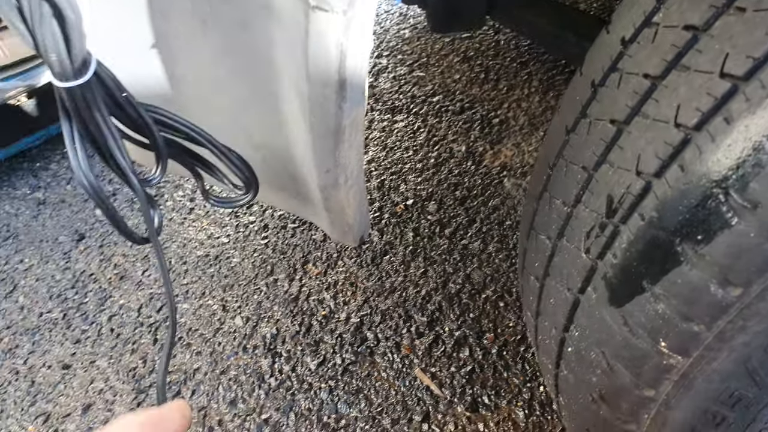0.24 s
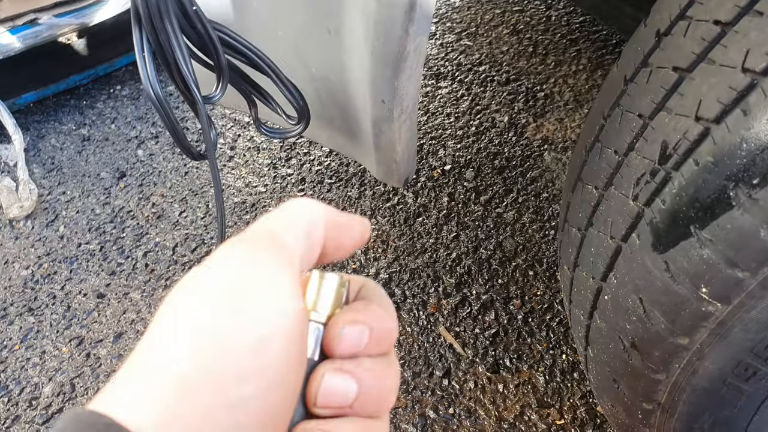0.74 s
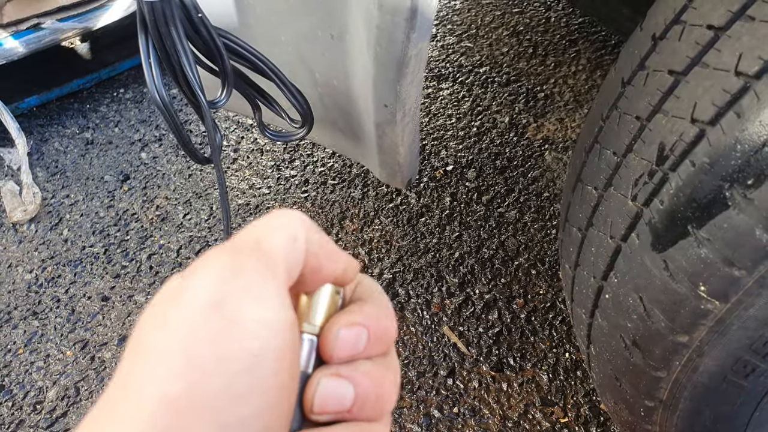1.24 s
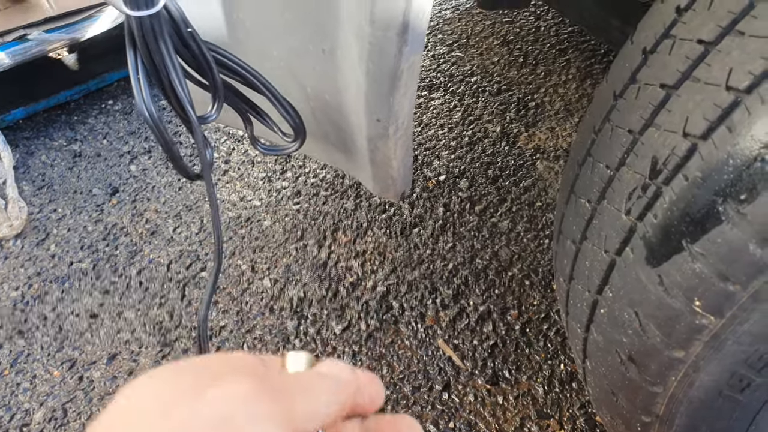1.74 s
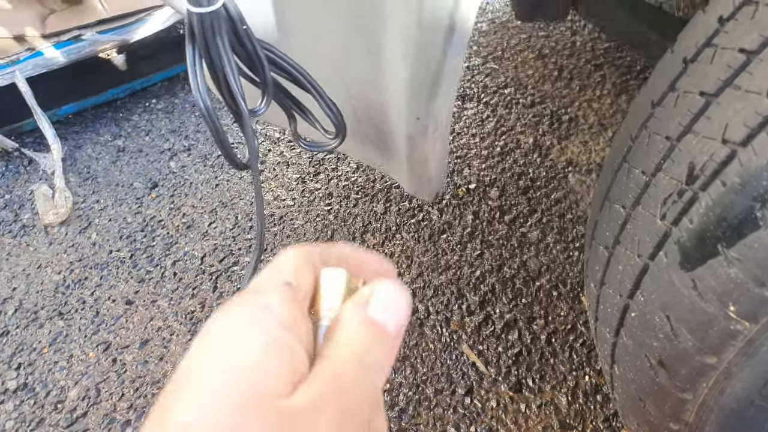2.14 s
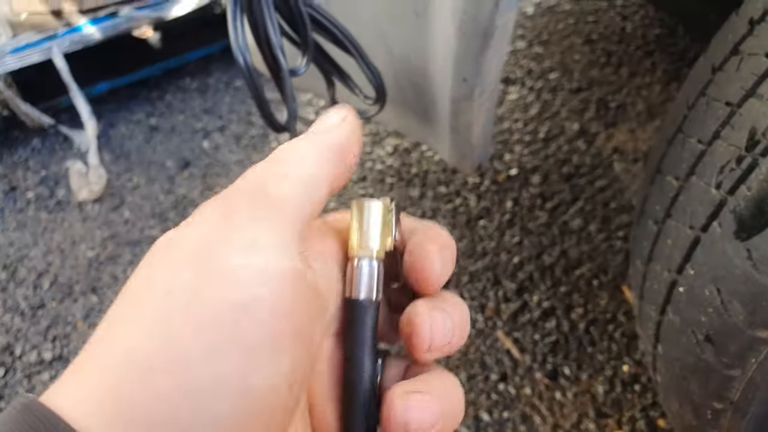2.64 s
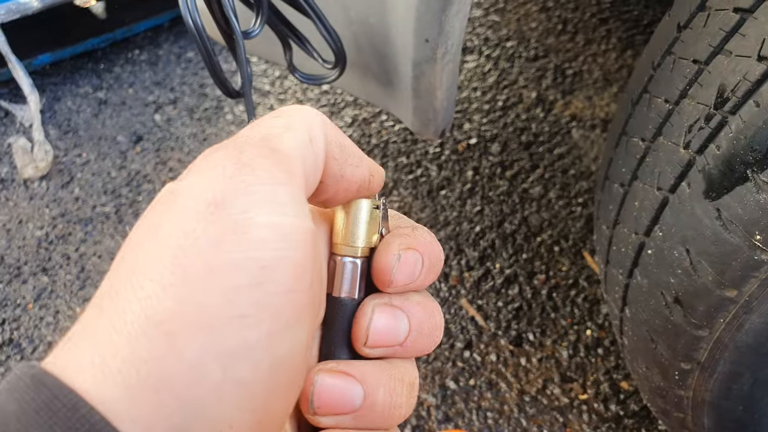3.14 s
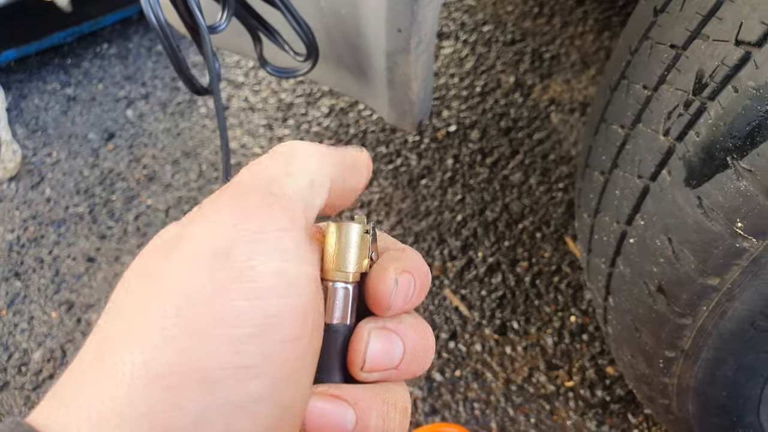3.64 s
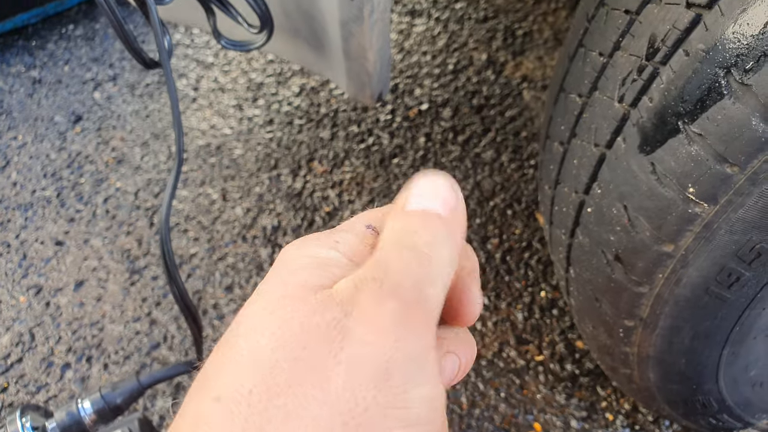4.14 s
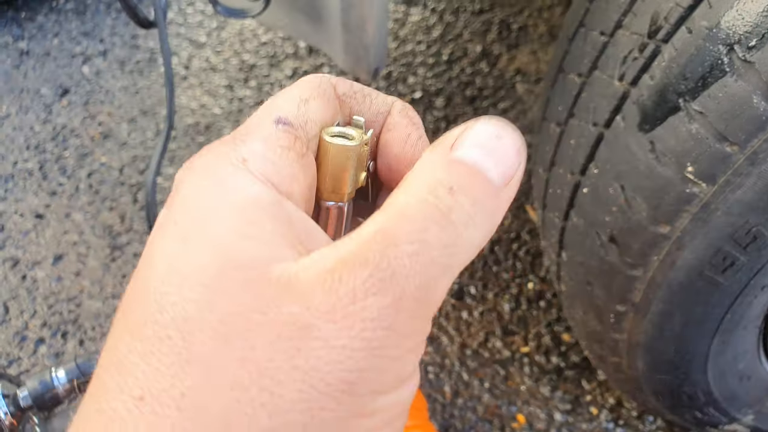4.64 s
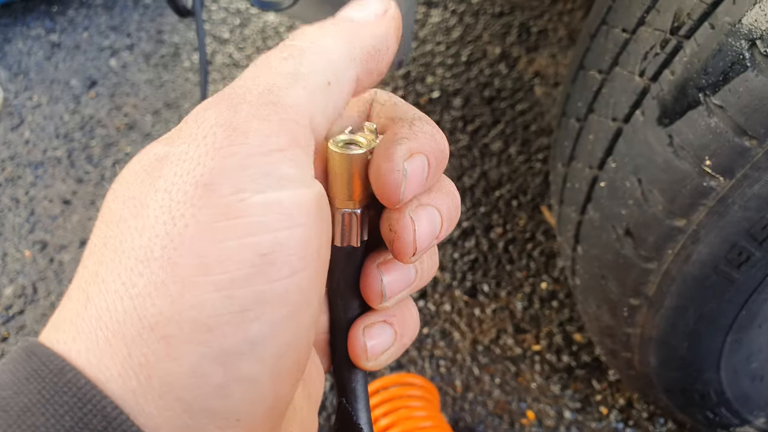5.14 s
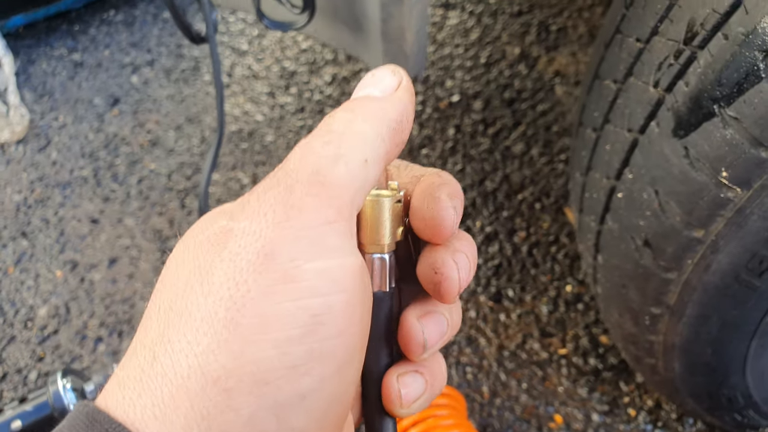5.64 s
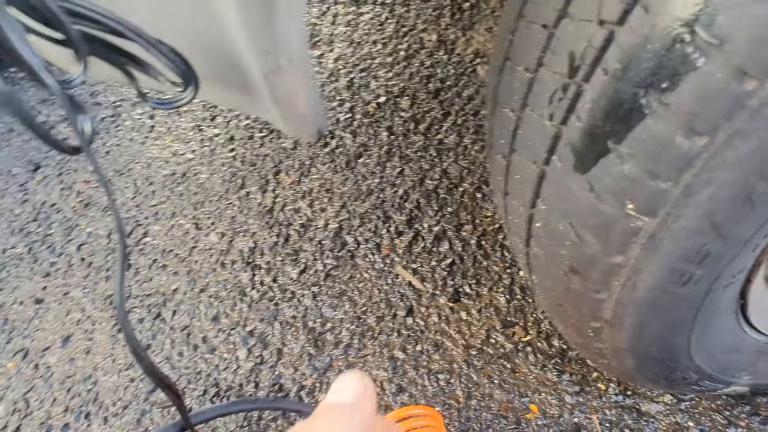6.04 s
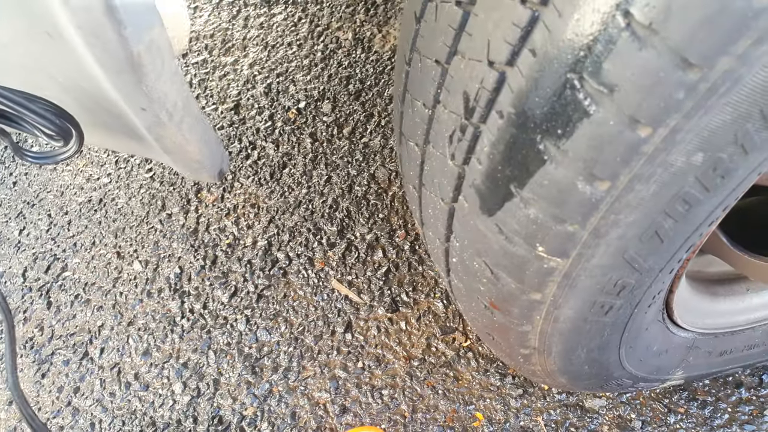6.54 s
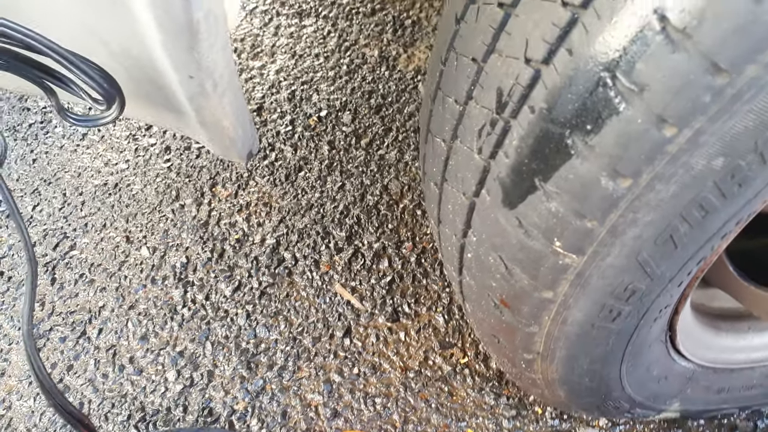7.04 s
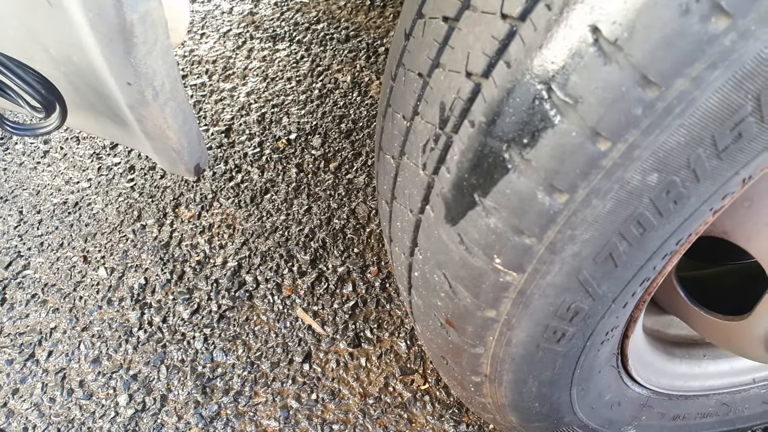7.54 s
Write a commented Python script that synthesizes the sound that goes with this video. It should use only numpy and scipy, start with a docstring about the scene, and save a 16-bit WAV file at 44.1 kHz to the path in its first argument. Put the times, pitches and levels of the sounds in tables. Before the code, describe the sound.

Loud, close hiss of air from an open hose, changing colour under a hand, over the even rattling hum of a portable compressor.

```python
"""Air compressor and open hose

A small twin-piston compressor drones beside a parked car: two uneven strokes a turn ring its casing,
and the valves clack. A hand plays with the open hose end, so the air jet hisses close to a phone's two
ports, its colour shifting on each side as thumb and nozzle move. Late on, the phone swings towards
the wheel and the pump changes colour."""
import sys
import numpy as np
from scipy import signal
from scipy.fft import rfft, irfft
from scipy.io import wavfile
from scipy.ndimage import uniform_filter1d

SR = 44100
rng = np.random.default_rng(int(sys.argv[2]) if len(sys.argv) > 2 else 0)


def transcribe(u):
    """Save the signal u as a 16-bit wav file named by the first command-line argument.

    u: samples, shape (n,) or (channels, n), limited to [-1, 1]; the rate is SR.
    q: integer samples, one column per channel.
    """
    v = np.clip(np.atleast_2d(u).T, -1, 1)
    q = np.round(v * 32767).astype(np.int16)
    wavfile.write(sys.argv[1], SR, q)


N = 343344

SECOND_STROKE_AT, SECOND_STROKE_SIZE = .435, .85  # place in the turn, size against the first stroke
KNOCK_AT = .88  # place in the turn where the valves close
# How far the pump leads at the left port. Each row: frequency in Hz, lead in radians.
PUMP_LEAD = [(0, 0), (300, .25), (780, .7), (840, 2.2), (920, 1.2), (1040, 2.9), (1240, 1.6), (1480, 3),
             (1800, 1.9)]
# The casing's change of colour after the swing. Each row: frequency in Hz, left and right gain in dB.
SWUNG_CASING = [(415, 0.5, 1.5), (440, -13, 2), (540, 0.5, -17), (582, 2, 7), (700, -12, -0.5),
                (950, 7, -0.5)]


def undb(db):
    return 10 ** (np.asarray(db) / 20)


def read(table, at, log=False):
    """Columns of a table, joined by straight lines along the first."""
    key, *columns = np.transpose(table)
    if log:
        key, at = np.log(key), np.log(np.maximum(at, 1))
    return np.array([np.interp(at, key, column) for column in columns])


def wander(shape, sizes):
    """Random drift with a spread of 1, smoothed twice along each axis."""
    field = rng.standard_normal(shape)
    for axis, size in enumerate(sizes):
        for _ in range(2):
            field = uniform_filter1d(field, max(int(size), 1), axis=axis)
    return field / field.std()


def shaped_noise(gain_db, common, lead, size):
    """Stereo noise in dB per Hz; a share is common to both ports, and the left leads in radians."""
    frames = dict(nperseg=size, noverlap=size * 3 // 4)
    hz, s, noise = signal.stft(rng.standard_normal((3, N)), SR, **frames)
    share = np.clip(common(hz[:, None], s), 0, 1)
    ports = np.sqrt(share) * noise[0] + np.sqrt(1 - share) * noise[1:]
    ports[0] *= np.exp(1j * lead(hz[:, None], s))
    return signal.istft(ports * undb(gain_db(hz, s)), SR, **frames)[1][:, :N] * np.sqrt(SR / 2)


def causal_phase(log_gain):
    """Phase of a body that rings only after it is pushed, from the cepstrum of its gain."""
    cepstrum = irfft(log_gain)
    half = len(cepstrum) // 2
    cepstrum[1:half] *= 2
    cepstrum[half + 1:] = 0
    return rfft(cepstrum).imag


def swung(t, start_s=5.7, length_s=.52):
    """0 before the phone swings towards the wheel, 1 after."""
    return np.clip((t - start_s) / length_s, 0, 1)


def valve_share(hz, from_hz=1120, full_hz=1200):
    """Crossover: 0 where the casing rules, 1 where the valve plates do."""
    return np.clip((hz - from_hz) / (full_hz - from_hz), 0, 1)


def pump_db(t, clack_db=(-1.5, 4.5), swung_clack_db=(3.5, -4)):
    """Heard level of the casing and of the valve clack (left, right), which rises and falls further."""
    # The phone's automatic gain on the pump, drawn as a set curve. Each row: time in seconds, gain in dB.
    gain_ride = [(0, 4.5), (.5, 0.5), (1.0, 1), (1.4, 0), (2.25, 1.5), (2.7, 0), (3.4, -1.5), (4.0, -1.5),
                 (4.35, 0), (4.55, -3), (5.6, -.5), (6.3, -1.5), (7.2, 2), (7.79, 2.5)]
    casing_db = read(gain_ride, t)[0]
    port_db = np.array(clack_db)[:, None] + np.outer(swung_clack_db, swung(t))
    return casing_db, 1.79 * casing_db + port_db


def pump_harmonics(crank_hz=40.04, knock_smear=.004):
    """The pump's tones: their frequencies, and a player that mixes them along the crank's turns."""
    # The pump's spectrum. Each row: multiple of the crank speed, left and right base level in dB.
    harmonics = [(1, -43, -43), (2, -38, -38), (3, -39, -38), (4, -42, -42), (5, -40, -40), (6, -50, -49),
                 (7, -38, -37), (8, -49, -45), (9, -43, -38), (10, -60, -41), (11, -55, -55),
                 (12, -43, -54), (13, -38, -54), (14, -34, -41), (15, -46, -55), (16, -46, -49),
                 (17, -51, -56), (18, -47, -47), (19, -53, -51), (20, -59, -45), (21, -43, -46),
                 (22, -53, -56), (23, -47, -44), (24, -56, -50), (25, -56, -45), (27, -52, -48),
                 (28, -50, -49), (29, -45, -47), (30, -42, -48), (31, -44, -42), (32, -41, -44),
                 (33, -47, -44), (34, -42, -42), (35, -46, -44), (36, -51, -47)]
    order, *level_db = np.transpose(harmonics)
    hz = order * crank_hz
    stroke_pair = 1 + SECOND_STROKE_SIZE * np.exp(-2j * np.pi * order * SECOND_STROKE_AT)
    body = np.log(undb(level_db[1]) / (np.abs(stroke_pair) + .3))
    body = uniform_filter1d(body, size=3, mode="nearest")
    # An open port radiates no steady pressure, so each suction dip rebounds.
    body = np.interp(np.arange(65), order, body, left=body[0] - 3)
    dip_phase = np.angle(stroke_pair) + causal_phase(body)[order.astype(int)]
    knock_phase = -2 * np.pi * (order * KNOCK_AT + knock_smear * (order - 32) ** 2)
    phase = np.where(valve_share(hz) > .5, knock_phase, dip_phase)
    lead = read(PUMP_LEAD, hz)[0] * np.array([[1], [0]])
    partials = -np.sqrt(2) * undb(level_db) * np.exp(1j * (phase + lead))

    def play(gains, turn):
        cycle = np.arange(2049) / 2048
        wave = np.real(partials * gains @ np.exp(2j * np.pi * order[:, None] * cycle))
        return np.array([np.interp(turn % 1, cycle, side) for side in wave])
    return hz, play


def valve_knock(t, turn, jitter_turns=.002, scatter_db=2):
    """The valves knock once a turn, no two closings alike in time or force."""
    hz, play = pump_harmonics()
    _, valve_db = pump_db(t)
    knock = play(valve_share(hz) > .5, turn + jitter_turns * wander(N, [SR / 25]))
    swing_db = np.interp(swung(t), [0, 1], [-1, 1.5])
    return knock * undb(valve_db + swing_db + scatter_db * wander(N, [SR / 80]))


def casing_drone(t, turn, bass_hz=250):
    """Two suction dips a turn ring the casing; the gain ride moves the bass more than the mids."""
    hz, play = pump_harmonics()
    casing_db, _ = pump_db(t)
    bass = play(hz <= bass_hz, turn) * undb(1.3 * casing_db)
    mid_band = (hz > bass_hz) * (valve_share(hz) <= .5)
    before = play(mid_band, turn)
    after = play(mid_band * undb(read(SWUNG_CASING, hz)), turn)
    mids = before + swung(t) * (after - before)
    return bass + mids * undb(casing_db + wander(N, [SR / 12]))


def panel_rings(t, turn, strike_at=.99, scatter_db=2, scatter_rad=.75, swung_right_db=11.5):
    """Each turn's first stroke strikes the casing panels, never with quite the same force or timing."""
    # Panel modes. Each row: pitch in Hz, time to fall 60 dB in seconds, left and right base level
    # in dB, left lead in radians.
    modes = [(1045.7, 0.15, -23.5, -38, 2.75), (1554, 0.057, -35.5, -49.5, 0.2)]
    hits = np.flatnonzero(np.diff(np.floor(turn - strike_at)))
    panels = 0
    for hz, t60, *level_db, lead in modes:
        force, slip = rng.standard_normal((len(hits), 2)).T
        blows = np.zeros(N, complex)
        blows[hits] = undb(scatter_db * force) * np.exp(1j * scatter_rad * slip)
        pole = np.exp(2j * np.pi * hz / SR - np.log(1000) / (t60 * SR))
        ring = signal.lfilter([1], [1, -pole], blows)
        panels += undb(level_db)[:, None] * np.imag(ring * np.exp(1j * np.array([[lead], [0]])))
    casing_db, _ = pump_db(t)
    return panels * undb(casing_db + np.outer([0, swung_right_db], swung(t)))


def pump_rattle(turn, burst_turns=.13, clack_turns=.09):
    """Noise that bursts after each stroke in the casing and at each closing in the valves."""
    # Rough breath between the tones. Each row: frequency in Hz, left and right base level in dB per Hz.
    breath = [(25, -84, -84), (60, -64, -64), (180, -71, -71), (400, -78, -72), (460, -81, -79),
              (600, -77, -77), (800, -75, -74), (980, -74, -72), (1040, -62, -69), (1110, -68, -73),
              (1250, -69, -68), (1420, -72, -71), (1600, -78, -78)]

    def pulsed_noise(band, gate):
        def gain_db(hz, s):
            casing_db, valve_db = pump_db(s)
            casing_db = casing_db + read(SWUNG_CASING, hz)[:, :, None] * swung(s)
            share = valve_share(hz)[:, None]
            ride_db = (1 - share) * casing_db + share * valve_db[:, None]
            return read(breath, hz, log=True)[:, :, None] + ride_db + 10 * np.log10(band(share) + 1e-9)
        noise = shaped_noise(gain_db, common=lambda hz, s: .88 - hz / 2600,
                             lead=lambda hz, s: read(PUMP_LEAD, hz)[0], size=2048)
        return noise * gate / np.sqrt(np.mean(gate ** 2))
    first = np.exp(-(turn % 1) / burst_turns)
    second = SECOND_STROKE_SIZE * np.exp(-((turn - SECOND_STROKE_AT) % 1) / burst_turns)
    from_closing = (turn - KNOCK_AT + .5) % 1 - .5
    closing = np.exp(-.5 * (from_closing / clack_turns) ** 2)
    casing = pulsed_noise(band=lambda share: 1 - share, gate=.65 + first + second)
    valves = pulsed_noise(band=lambda share: share, gate=.5 + closing)
    return casing + valves


def hand_db(t, hold_share=.31):
    """The hand's EQ on the jet: slow aim plus thumb strokes that close, hold and open."""
    # The nozzle's aim. Each row: time in seconds, then in dB the low rush, its bottom,
    # body left and right, lower body left and right, edge left and right.
    aim = [(0, -7.5, 8, 3.5, 2, 6.5, -7, 5.5, -1.5), (.5, 1, -2.5, -1, -4.5, 1.5, 2.5, 6.5, 4),
           (1.1, -0.5, 2, -0.5, -1.5, 5.5, 0.5, 4, 1), (1.7, -4, -3.5, 0, -4, -3, 3, 4, -3.5),
           (2.35, -5.5, 0, 6, -8, -1.5, 4, 6, -3), (2.7, 0.5, -7, 2.5, -0.5, 3, -1.5, 1, -2.5),
           (3.4, 5, 1, 0.5, -1, -3.5, -2.5, 2, 6.5), (3.7, 1.5, -3, 0.5, -1.5, 0, -4, -1, 1.5),
           (4.3, 1.5, -7.5, 0.5, 2, 7, 1, -0.5, 3.5), (4.55, -5, -1.5, 7, -0.5, 0, 1, 5, -1),
           (4.9, -6, -8, 5, -10.5, -2, 5.5, 3, -3), (5.35, -0.5, 1.5, -2.5, -4, 9.5, 1.5, 1, 1),
           (5.75, -4.5, 0, 3.5, 1.5, 1, -4.5, 2.5, 2.5), (6.5, -0.5, -3, 5, 2.5, 1.5, -6, 2, 2),
           (6.85, 2, -3, 2, 1, 2, -1.5, 1.5, -4.5), (7.2, -2, -3, 1.5, -0.5, 1, -9, 4.5, -2),
           (7.79, -4, -1, 1.5, 0.5, 3.5, -5, 4, 0)]
    # Thumb across the hose end. Each row: middle and length in seconds, then rush, body and edge in dB.
    thumb = [(0.144, 0.15, 3, 2.5, 5.5), (0.366, 0.18, 5, 2, 0.5), (0.956, 0.38, 10, 4.5, 0.5),
             (1.306, .2, 12.5, 6, 3), (1.515, 0.19, 12, 5, 2), (1.934, 0.21, 2.5, 5, 1.5),
             (2.53, 0.14, 2, 3.5, 0), (2.752, 0.12, -4, -0.5, 9), (2.947, 0.22, 5, 1, 3),
             (3.798, 0.16, 4, 5.5, 2.5), (4.052, 0.14, 7.5, -4, -3), (4.145, 0.11, -3, 0, 4),
             (4.26, 0.19, 10, -6, -1), (4.45, 0.17, 6, 0, 7), (5.113, 0.13, 7.5, 2, 1),
             (5.28, 0.045, 4.5, 2, 4)]
    middle, length, *stroke_db = np.transpose(thumb)
    away = 2 * np.abs(t[:, None] - middle) / length
    pressed = np.clip((1 - away) / (1 - hold_share), 0, 1)
    rush, body, edge = np.array(stroke_db) @ pressed.T
    still = np.zeros_like(t)
    return read(aim, t) + [rush, still, .9 * body, body, still, still, .51 * edge, edge]


def air_jet(patchy_db=1.73, flicker_db=1.72, hump_rest_hz=10680, core_width_hz=350):
    """Turbulent hiss: low rush, body and top edge follow the hand, and narrow patches come and go."""
    # The jet's colour. Each row: frequency in Hz, left and right base level in dB per Hz.
    colour = [(1630, -68, -65), (2020, -67.5, -62.5), (2900, -71, -67.5), (3650, -68.5, -65),
              (4230, -72, -56), (5900, -62, -63.5), (6460, -61.5, -59), (7180, -61.5, -55),
              (8130, -57, -67), (8870, -65.5, -54), (9100, -65.5, -61), (10300, -64.5, -50.5),
              (12050, -63, -58), (14800, -62, -62), (16600, -57, -50.5)]
    # A hump of hiss on the right slides with the aim. Each row: time in seconds, centre in Hz,
    # gain of its narrow core in dB.
    hump = [(0, 11360, -5), (2.6, 11180, 4.5), (4.5, 11120, -2.5), (5.0, 11300, 6.5), (5.7, 11340, 2),
            (6.1, 10600, -2), (6.8, 10670, 3.5), (7.79, 11450, -0.5)]
    # The jet's usual lead at the left port. Each row: frequency in Hz, lead in radians.
    usual_lead = [(1400, 2.3), (2400, 2.5), (2930, 3.3), (3960, 5.6), (5510, 9.4), (7060, 12.1),
                  (12200, 18.8), (15500, 29)]
    # The nozzle moves across the phone. Each row: time in seconds, factor on the usual lead.
    nozzle_side = [(0, 1), (.4, 1.28), (.7, 1.02), (2.9, 1.08), (3.75, 1.02), (4.2, .81), (4.55, 1),
                   (5.2, .9), (6.2, 1), (6.6, .8), (7.79, .9)]

    def gain_db(hz, s):
        rush, bottom, body_l, body_r, lower_l, lower_r, edge_l, edge_r = hand_db(s)
        hz = hz[:, None]
        rush_band = np.clip((4500 - hz) / 1000, 0, 1)
        rush_taper = np.clip((hz - 1300) / 900, .2, 1)
        bottom_band = np.clip((2700 - hz) / 700, 0, 1)
        lower_band = (1 - rush_band) * np.clip((6600 - hz) / 900, 0, 1)
        edge_band = np.clip((hz - 8500) / 1000, 0, 1)
        # The hump moves more than its flanks.
        hump_shape = np.clip(np.minimum((14500 - hz) / 2500, (hz - 8800) / 1500), .3, 1)
        eq_db = rush_band * rush_taper * np.array([.52 * rush, rush])[:, None]
        eq_db += (1 - rush_band - edge_band) * np.array([body_l, body_r])[:, None]
        eq_db += bottom_band * bottom
        eq_db += lower_band * np.array([lower_l, lower_r])[:, None]
        eq_db[0] += edge_band * edge_l
        eq_db[1] += edge_band * hump_shape * edge_r
        centre_hz, core_db = read(hump, s)
        slide_hz = edge_band * (centre_hz - hump_rest_hz)
        eq_db[0] += read(colour, hz, log=True)[0]
        eq_db[1] += read(colour, hz - slide_hz, log=True)[1]
        eq_db[1] += core_db * np.exp(-.5 * ((hz - centre_hz) / core_width_hz) ** 2)
        low_cut_db = -30 * np.log2(np.maximum(1600 / np.maximum(hz, 1), 1))
        patches = wander(eq_db.shape, [1, 3, 150])
        flicker = wander(eq_db.shape, [1, 14, 16])
        return eq_db + low_cut_db + patchy_db * patches + flicker_db * flicker

    def common(hz, s):
        return .92 - hz / 24000 + .38 * wander((len(hz), len(s)), [5, 100])

    def lead(hz, s):
        treble_drift = (hz / 11000) ** 2 * wander((len(hz), len(s)), [8, 60])
        return read(usual_lead, hz)[0] * read(nozzle_side, s)[0] + treble_drift
    return shaped_noise(gain_db, common, lead, size=512)


def scene(start_turn=.327):
    """One crank drives every layer of the pump, and the jet hisses over it."""
    # The crank's speed. Each row: time in seconds, turns per second.
    crank = [(0, 40.41), (1.6, 40.025), (2.6, 40.03), (3.7, 39.925), (4.6, 39.995), (6.0, 40.02),
             (7.79, 40.04)]
    t = np.arange(N) / SR
    turn = start_turn + np.cumsum(read(crank, t)[0]) / SR
    pump = valve_knock(t, turn) + casing_drone(t, turn) + panel_rings(t, turn) + pump_rattle(turn)
    return pump + air_jet()


def record(dry, top_hz=15720):
    """The phone rounds the loudest peaks and cuts the top steeply."""
    high_cut = signal.ellip(12, .3, 80, top_hz, fs=SR, output="sos")
    return signal.sosfilt(high_cut, np.tanh(dry))


dry = scene()
out = record(dry)
transcribe(out)
```